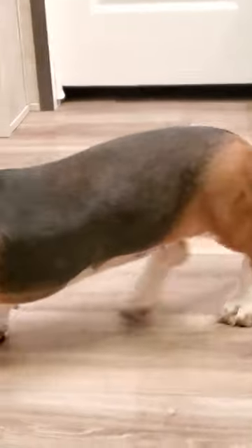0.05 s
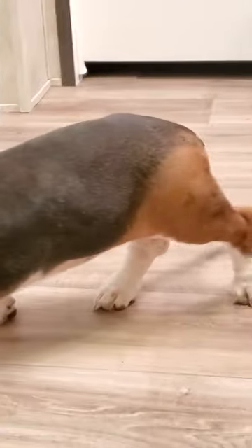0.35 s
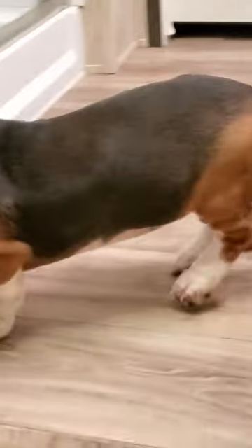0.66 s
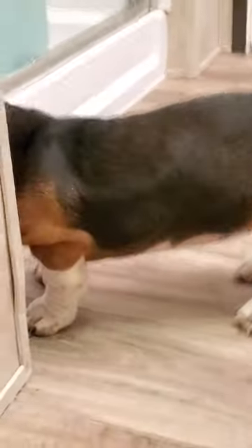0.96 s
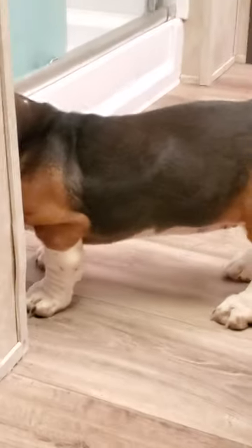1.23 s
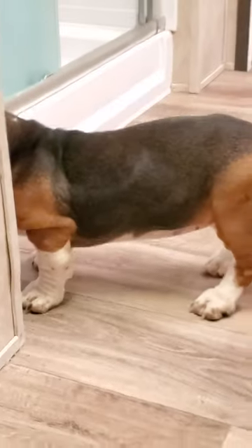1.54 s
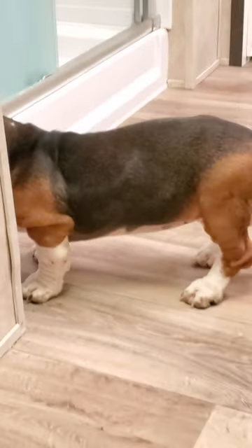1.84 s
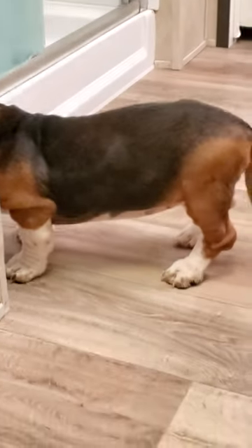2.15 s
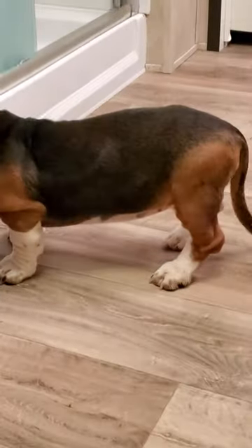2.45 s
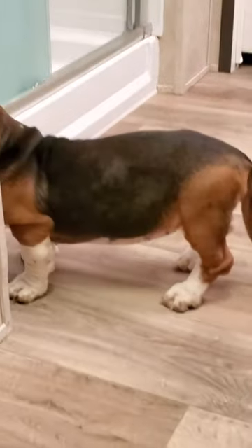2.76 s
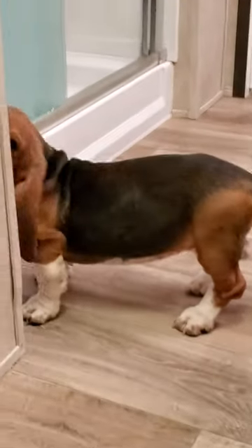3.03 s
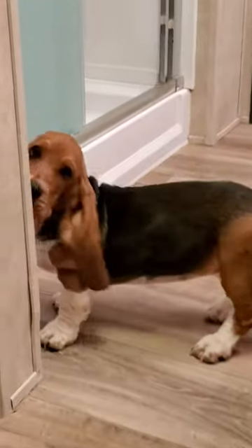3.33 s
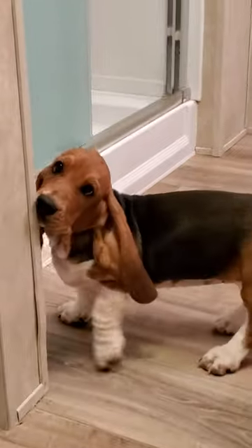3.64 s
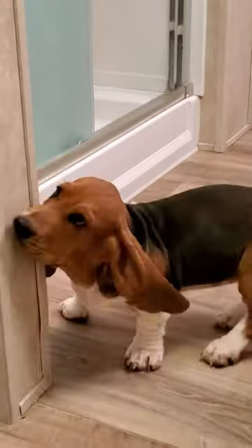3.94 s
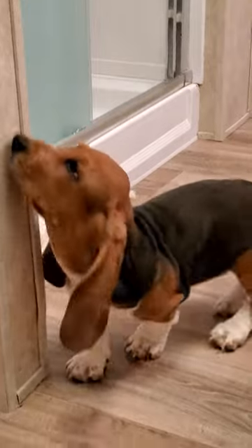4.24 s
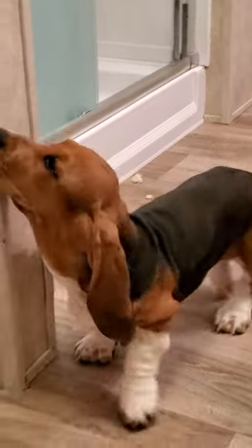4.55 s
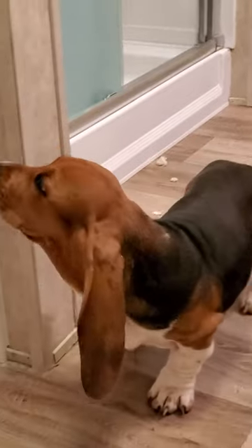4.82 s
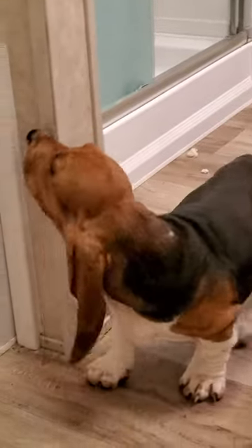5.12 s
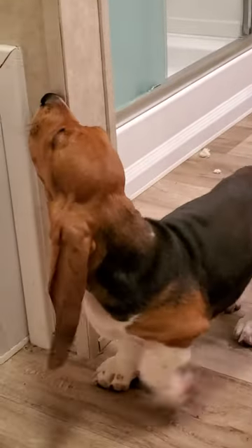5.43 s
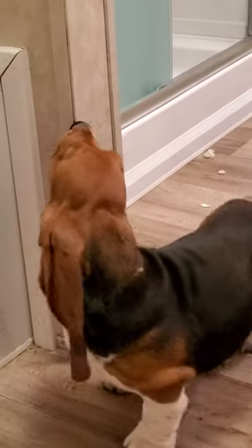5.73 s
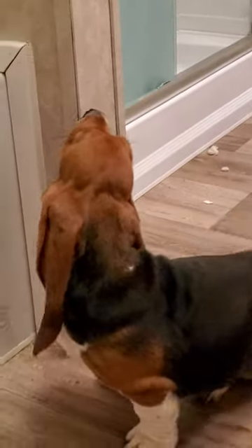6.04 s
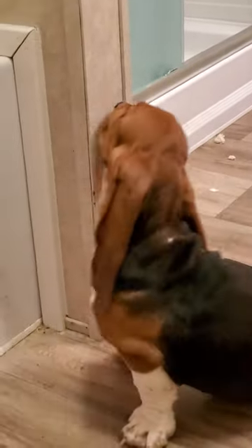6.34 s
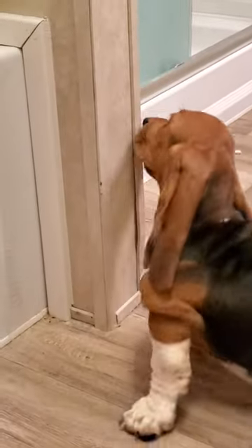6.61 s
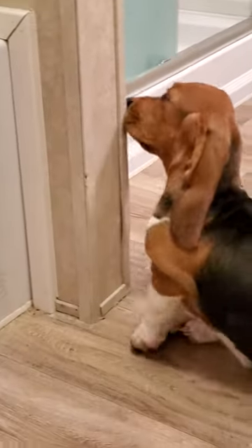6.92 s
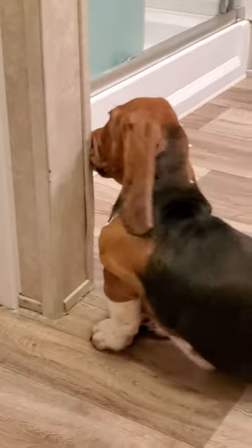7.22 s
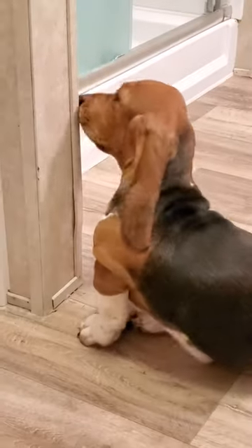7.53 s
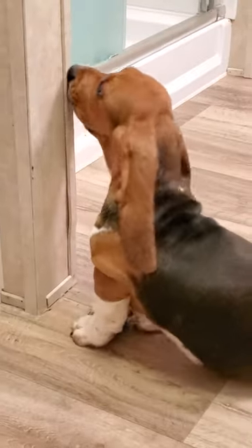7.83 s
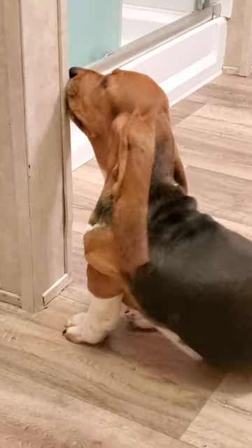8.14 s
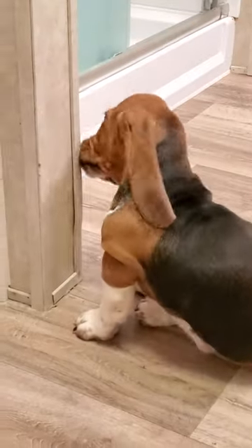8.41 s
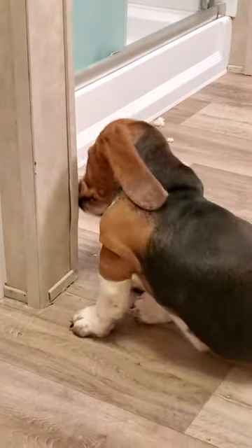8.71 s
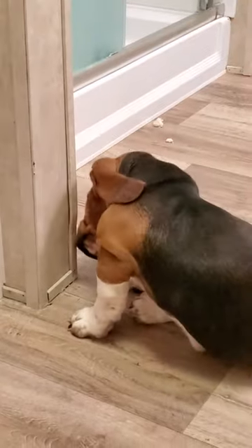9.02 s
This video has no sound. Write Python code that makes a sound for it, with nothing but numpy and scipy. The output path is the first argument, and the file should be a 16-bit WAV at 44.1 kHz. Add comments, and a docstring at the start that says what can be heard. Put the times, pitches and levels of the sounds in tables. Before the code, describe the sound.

A finger rubs over the microphone and ends with a low bump. A sleeve swishes close by on the right, with soft booms from a shifting grip. Then a puppy potters on a hard plank floor, claws ticking and pads scuffing irregularly, and gives a few short sniffs. The small bathroom adds a brief echo, over a faint steady hiss and hum.

```python
"""Puppy in a small bathroom

A puppy potters about on a plank floor: claws tick, pads scuff and thud, and it snuffles at a door
frame, while the walls echo and the glass and panels ring. The hand that holds a camera rubs over
the right microphone port and shifts its grip with low booms, and a sleeve swishes close by.
A faint mains hum lies under a steady background hiss."""
import sys
import numpy as np
from scipy import signal
from scipy.fft import rfft, irfft, next_fast_len
from scipy.io import wavfile
from scipy.ndimage import map_coordinates

SR = 44100
rng = np.random.default_rng(int(sys.argv[2]) if len(sys.argv) > 2 else 0)


def wav_out(sig):
    """Save sig, one row per channel (or a flat mono array), as 16-bit PCM at SR to the path in sys.argv[1]."""
    wavfile.write(sys.argv[1], SR, np.round(np.clip(np.atleast_2d(sig).T, -1, 1) * 32767).astype(np.int16))


N = 404260


def amp(db):
    """Amplitude ratio of a level in decibels."""
    return 10 ** (np.asarray(db) / 20)


def unit(x):
    """Normalisation to an rms of 1."""
    return x / np.sqrt(np.mean(x ** 2) + 1e-20)


def along(points, hz):
    """Interpolation of (f/Hz, value) points on a logarithmic frequency axis."""
    f, value = np.transpose(points)
    return np.interp(np.log(hz + 1), np.log(f + 1), value)


def wobble(rate, size=N):
    """Smooth random modulation: a spline through `rate` Gaussian knots a second."""
    knots = rng.standard_normal(int(size * rate / SR) + 4)
    return map_coordinates(knots, [np.arange(size) * rate / SR])


def filtered(x, response):
    """Linear filtering: the spectrum of x times a frequency response."""
    size = next_fast_len(x.shape[-1] + 8192)
    return irfft(rfft(x, size) * response(np.fft.rfftfreq(size, 1 / SR)), size)[..., :x.shape[-1]]


def coloured(x, spectrum, tilt_db):
    """Spectral shaping to rms 1, with a tilt of tilt_db per octave above about 1 kHz."""
    return unit(filtered(x, lambda hz: amp(along(spectrum, hz) + tilt_db * np.log2(1 + hz / 1000))))


def noise(spectrum, shape=N, tilt_db=0):
    """Gaussian noise of a given spectrum and rms 1."""
    return coloured(rng.standard_normal(shape), spectrum, tilt_db)


def add(track, start, sound):
    """Superposition of a sound on a track, `start` seconds in."""
    part = track[max(round(start * SR), 0):][:len(sound)]
    part += sound[:len(part)]


def stroke(length, taper):
    """A gesture's tapered-cosine envelope: swell, hold, release."""
    return signal.windows.tukey(int(length * SR), np.clip(taper, 0, 1))


def strokes(rows, taper):
    """The summed envelope of (t/s, duration/s, level/dB) gestures."""
    out = np.zeros(N)
    for start, length, db in rows:
        add(out, start, amp(db) * stroke(length, taper))
    return out


def linger(gain, seconds):
    """Exponential decay of an envelope's energy, with this time constant."""
    keep = np.exp(-1 / (seconds * SR))
    return np.sqrt(signal.lfilter([1 - keep], [1, -keep], gain ** 2))


def ports(pair):
    """Spatial coherence: two close microphones share the bass but not the treble."""
    # likeness of left and right: f/Hz, correlation
    coherence = [(60, 0.88), (250, 0.9), (700, 0.12), (1500, 0)]
    angle = lambda hz: np.arccos(np.clip(along(coherence, hz), -1, 1)) / 2
    mid, side = filtered(pair, lambda hz: np.array([np.cos(angle(hz)), np.sin(angle(hz))]))
    return np.array([mid + side, mid - side])


def background(hiss_db=-59.5):
    """Noise floor: a steady hiss, and mains harmonics that wander slightly in phase."""
    # spectrum of the steady background hiss, with a dip near 10 kHz: f/Hz, level/dB
    hiss_spectrum = [(20, -20), (42, -8.5), (65, -5.5), (90, -7.5), (130, -20), (160, -23), (330, -20),
                     (500, -23), (820, -30), (3400, -31.5), (5500, -38), (8300, -35.5), (9800, -51),
                     (15800, -39.5)]
    # mains harmonics: f/Hz, rms level/dB
    harmonics = [(59.8, -60), (119.8, -69.5), (240, -82), (359, -78)]
    t = np.arange(N) / SR
    hum = sum(amp(db) * np.sqrt(2) * np.sin(2 * np.pi * hz * t + 0.77 * wobble(1.8))
              for hz, db in harmonics)
    return amp(hiss_db) * unit(ports(noise(hiss_spectrum, (2, N)))) + hum


def finger():
    """Friction on a microphone port: dragging skin rasps and rumbles, squeaks faintly and bumps."""
    # fingertip drags: t/s, duration/s, rasp level/dB, rumble level/dB
    drags = [(0, 0.086, -64, -45.5), (0.125, 0.098, -43, -47.5), (0.201, 0.068, -46.5, -55),
             (0.274, 0.032, -44.5, -50), (0.308, 0.028, -42, -41), (0.342, 0.058, -50, -43),
             (.385, 0.0047, -41, -50), (0.387, 0.06, -37.5, -36.5), (.435, 0.088, -35, -40),
             (.505, 0.096, -35, -42), (0.577, 0.109, -46, -37), (0.658, 0.16, -54, -42)]
    # spectrum of rasping skin: f/Hz, level/dB
    rasp_spectrum = [(71, -14), (120, -10), (166, -6), (407, -5.5), (432, -5), (975, -8), (1490, -5),
                     (2980, -8), (4480, -13), (8950, -47), (11000, -34.5), (15500, -43.5)]
    # spectrum of skin squeaking on the case: f/Hz, level/dB
    squeak_spectrum = [(300, -10.5), (1500, -10), (1850, -0.5), (2200, -9.5), (4500, -20), (9000, -64)]
    # spectrum of the port's rumble: f/Hz, level/dB
    rumble_spectrum = [(20, -18), (45, -16), (75, -3), (120, -18.5), (300, -41), (1000, -86)]
    # fingertip impacts on the port: t/s, level/dB, f/Hz
    bumps = [(.317, -34.5, 69), (.765, -32, 330), (.770, -27.5, 231), (.778, -24, 51.6), (.798, -34, 1100)]
    start, length, rasp_db, rumble_db = np.transpose(drags)
    roughness = unit(amp(1.9 * wobble(70.06) + 0.92 * wobble(500)))
    skin = strokes(zip(start, length, rasp_db), taper=0.55) * roughness * noise(rasp_spectrum)
    squeak = stroke(length=0.55, taper=0.012)  # ends once the finger presses harder
    add(skin, 0, amp(-52.5) * squeak * noise(squeak_spectrum, len(squeak)))
    push = strokes(zip(start, length, rumble_db), taper=0.24)
    rumble = linger(push, seconds=0.015) * noise(rumble_spectrum)
    return skin + rumble + knocks(bumps, cycles=2.2, attack_s=0.00013, puff_db=4.5)


def knocks(rows, cycles, attack_s, puff_db):
    """Damped oscillation: a soft blow's tone and dull puff fall 60 dB in `cycles` periods."""
    out, t = np.zeros(N), np.arange(SR // 3) / SR
    for start, db, hz in rows:
        puff = noise([(hz / 2, -6), (hz, 0), (hz * 2, -11), (hz * 8, -36), (hz * 20, -70)], len(t))
        envelope = amp(-60 * t * hz / cycles) * (1 - np.exp(-t / attack_s))
        add(out, start, amp(db) * envelope * (np.sin(2 * np.pi * hz * t) + amp(puff_db) * puff))
    return out


def thuds():
    """Damped low tones: paws thud on the floor, and the hand booms as it shifts on the camera."""
    # soft low thuds of paws and hand: t/s, level/dB, f/Hz
    blows = [(.075, -40, 345), (1.07, -46, 135), (1.071, -46.5, 290), (1.071, -39.5, 620),
             (1.073, -34.5, 1070), (2.985, -42, 77), (3.037, -38, 78.5), (3.4, -46, 74), (4.09, -45.5, 98),
             (4.575, -47, 212), (4.6, -46.5, 87.6), (5.6, -45, 76.4), (6.002, -35, 245), (6.014, -36, 61.9),
             (6.028, -35, 171), (6.045, -34, 215), (7.535, -44, 505)]
    return knocks(blows, cycles=26.2, attack_s=0.007, puff_db=-6)


def sleeve(direct_share=0.24):
    """Cloth friction: each stroke hisses into the right port and rustles until the folds settle."""
    # strokes of the sleeve: t/s, duration/s, hiss level/dB, rustle level/dB
    swishes = [(.77, 0.13, -87, -57), (0.844, 0.043, -44, -46.5), (0.887, 0.21, -79, -70),
               (1.18, 0.36, -64, -52.5), (1.486, .15, -54.5, -58.5), (1.608, 0.35, -59.5, -59),
               (1.774, 0.41, -47.5, -59), (1.836, 0.12, -60, -56), (2.233, .15, -57, -70),
               (2.436, .14, -54, -56.5), (2.623, 0.15, -58, -70), (2.869, .12, -49, -59.5),
               (3.07, 0.16, -63.5, -83), (3.367, 0.12, -54, -64.5), (3.608, 0.23, -63, -62),
               (3.867, .11, -51.5, -60), (3.924, 0.25, -68.5, -76), (7.25, 0.68, -86, -66)]
    # spectrum of the silky hiss: f/Hz, level/dB
    hiss_spectrum = [(500, -8), (2500, -4.5), (5000, -6), (7500, -10), (9800, -7), (11500, 7.5), (14000, 1),
                     (16000, -4)]
    # spectrum of rustling folds: f/Hz, level/dB
    rustle_spectrum = [(300, -17), (1300, 3.5), (2200, 0.5), (3000, 5.5), (4200, 3), (7500, -1.5),
                       (10000, -7), (15000, -3.5)]
    start, length, hiss_db, rustle_db = np.transpose(swishes)
    hiss = strokes(zip(start, length, hiss_db), taper=0.95) * from_right(noise(hiss_spectrum))
    direct = np.sqrt(direct_share) * from_right(noise(rustle_spectrum))
    diffuse = np.sqrt(1 - direct_share) * noise(rustle_spectrum, (2, N))
    folds = linger(strokes(zip(start, length, rustle_db), taper=0.76), seconds=0.032)
    return hiss * amp([[-10], [0]]) + folds * (direct + diffuse)


def from_right(x, lag_s=0.000395):
    """Propagation delay: sound from the right reaches the left port later."""
    return np.array([filtered(x, lambda hz: np.exp(-2j * np.pi * hz * lag_s)), x])


def pad(length, tilt_db):
    """Stick-slip friction: a sliding pad catches and slips, so its hiss is grainy."""
    # spectrum of a pad on wood: f/Hz, level/dB
    spectrum = [(300, -21), (900, -10.5), (1350, 0), (1900, 1.5), (3200, -0.5), (5000, -11), (8000, -20.5),
                (15000, -39.5)]
    swell = stroke(length, taper=0.72)
    grain = amp(3.5 * wobble(524, len(swell)))
    return swell * unit(grain * noise(spectrum, len(swell), tilt_db))


def claw(hz, hard_db):
    """Impact excitation: a claw cracks on a plank and rings; harder is brighter and shorter."""
    # modes of the tick: frequency ratio, level/dB, T60/s at hard_db = 0
    modes = [(1.002, 0, 0.0093), (1.3, 0, 0.0037), (1.6, 7, 0.0037), (2.1, -4, 0.0047), (2.8, -32, 0.0032)]
    # spectrum of the first touch: f/Hz, level/dB
    crack_spectrum = [(200, -24), (900, -8), (1500, 3), (4500, 7), (8000, -19), (15000, -26)]
    t = np.arange(SR // 20) / SR
    damping = amp(hard_db)
    ring = 0
    for ratio, db, t60 in modes:
        strength_db = db + hard_db * np.log2(ratio) + rng.standard_normal()
        envelope = amp(strength_db - 60 * damping * t / t60)
        ring += envelope * np.sin(2 * np.pi * (hz * ratio * t + rng.random()))
    crack = noise(crack_spectrum, len(t)) * amp(-60 * t / 0.0045)
    tick = (ring + amp(2 * hard_db - 12) * crack) * (1 - np.exp(-t / 0.00065))
    return tick / np.abs(tick).max()


def paws(pad_lead_s=0.003, toe_gap_s=0.0027, toe_loss_db=8):
    """Successive contacts: a pad lands, then two toes tick; between steps the pads shuffle."""
    # steps: t/s, claw level/dB, f/Hz, hardness/(dB per octave), slide duration/s, pad level/dB
    steps = [(1.068, -34, 2966, -3, 0.014, -40), (3.713, -37, 1610, -13.5, 0.042, -56),
             (3.7558, -20, 1698, -2, 0.021, -47), (3.774, -46, 1730, 6, 0.015, -58),
             (3.995, -40, 2220, 13, 0.046, -62), (4.176, -47.5, 1646, -13, 0.069, -58),
             (4.241, -37.5, 1670, -6, 0.019, -57), (4.332, -32, 1660, 4.5, 0.0094, -56),
             (4.511, -45, 1650, -4, 0.057, -56.5), (4.568, -32.5, 1510, 3, 0.012, -60),
             (5.3453, -28.5, 1820, -3.5, .035, -42.5), (5.3537, -28.5, 1780, 3.5, 0.0092, -52),
             (5.452, -19, 1450, 4, 0.016, -36.5), (5.457, -25, 1530, 18, 0.012, -33),
             (5.461, -23.5, 1620, -1.5, 0.078, -47.5), (5.535, -39, 1483, -15, 0.078, -55),
             (5.695, -44, 1930, -3, 0.13, -59.5), (6.149, -44.5, 1860, -4, 0.028, -59),
             (6.298, -46.5, 1890, -12, 0.046, -64.5),          (6.483, -29.5, 2530, 0, 0.011, -38),
             (6.736, -44.5, 1840, 6, 0.18, -60), (6.97, -40, 1310, 2.5, .01, -64),
             (7.868, -48.5, 1830, 4, .01, -70), (8.181, -45, 1810, 3, 0.012, -64)]
    # pads shuffling without a step: t/s, duration/s, level/dB
    scuffs = [(4.316, 0.021, -49), (5.313, 0.046, -48), (5.986, 0.16, -57), (6.092, 0.36, -65),
              (6.858, 0.14, -58.5)]
    out = np.zeros(N)
    for start, db, hz, hard_db, slide_s, pad_db in steps:
        add(out, start - pad_lead_s, amp(pad_db) * pad(slide_s, tilt_db=0.32 * hard_db))
        add(out, start, amp(db) * claw(hz, hard_db))
        add(out, start + toe_gap_s, amp(db - toe_loss_db) * claw(hz, hard_db))
    for start, length, db in scuffs:
        add(out, start, amp(db) * pad(length, tilt_db=0.4))
    return out


def bathroom(x, wet_db, early_db, ring_db):
    """Reverberation: direct sound, early reflections, then a short tail in which panels ring."""
    # reverberation time of the room: f/Hz, T60/s
    decay_times = [(100, 0.9), (500, 0.52), (2000, 0.38), (5000, 0.39), (12000, 0.4)]
    # modes of the glass and panels: f/Hz, level/dB, T60/s
    panels = [(791.5, 3, 0.29), (1150, -5, 0.38), (1308, -11, 0.34), (1536, -11.5, 0.3), (1640, 0.5, 0.11),
              (1800, -13, 0.064), (1894, 3, 0.24), (2280, 2, 0.55), (2360, -32, 0.45), (3020, -6, 0.48),
              (3336, -1.5, 0.2), (4910, 7, 0.25)]
    hz, frame_s, bands = signal.stft(rng.standard_normal((2, SR // 2)), SR, nperseg=256)
    decay = amp(-60 * frame_s / along(decay_times, hz)[:, None])
    _, tail = signal.istft(bands * decay, SR, nperseg=256)
    t = np.arange(tail.shape[1]) / SR
    tail = ports(tail * (1 - np.exp(-t / 0.0017)))
    ring = sum(amp(db - 60 * t / t60) * np.sin(2 * np.pi * f * t + rng.normal(0, 0.58, (2, 1)))
               for f, db, t60 in panels)
    tail /= np.linalg.norm(tail[0])
    ring /= np.linalg.norm(ring[0])
    response = amp(wet_db) * (tail + amp(ring_db) * ring)
    for side in response:
        early_s = rng.uniform(0.002, 0.021, size=6)  # echoes from the near walls
        side[(early_s * SR).astype(int)] += amp(early_db)
    response[:, 0] += 1  # direct sound
    return signal.fftconvolve(x[None], response, axes=1)[:, :N]


def grip(attack_s=0.02, fall_db_per_s=155):
    """Forced vibration: each shift of the hand murmurs through the camera body's resonances."""
    # shifts of the hand: t/s, duration/s, level/dB
    shifts = [(1.28, 0.041, -54), (1.702, 0.047, -56.5), (2.065, 0.043, -54.5), (2.238, 0.029, -60),
              (2.491, 0.047, -59), (2.921, 0.085, -42), (3.31, 0.097, -53), (3.712, 0.048, -51.5),
              (4.014, 0.14, -56.5), (4.331, 0.056, -55.5), (4.56, 0.047, -59)]
    # modes of the camera body: f/Hz, bandwidth/Hz, level/dB
    modes = [(74.4, 6.5, 10.5), (183, 15, -2), (239, 9.9, 1.5), (296, 22, -1), (383, 9.4, 4),
             (637, 150, -11), (822, 86, -13), (1177, 40, -6.5), (1555, 77, -12), (2070, 540, -20)]
    t = np.arange(N) / SR
    effort = np.zeros(N)
    for start, length, db in shifts:
        rise = np.clip((t - start) / attack_s, 0, 1)
        effort += rise * amp(db - fall_db_per_s * np.maximum(t - start - length, 0))

    def body(hz):
        """Modal sum of band-pass resonances with alternating signs."""
        return sum((-1) ** k * amp(db) * 1j * hz * width / (centre ** 2 - hz ** 2 + 1j * hz * width)
                   for k, (centre, width, db) in enumerate(modes))

    return effort * unit(filtered(ports(rng.standard_normal((2, N))), body))


def snuffles(pops_per_s=280, pops_db=-7):
    """Flow noise: puffs hiss and crackle through wet nostrils, sounding hollow when these flare."""
    # puffs of air: t/s, duration/s, level/dB, hollow tone level/dB re the hiss
    puffs = [(2.551, 0.066, -70.5, 6.5), (4.906, 0.059, -35.5, -16.5), (5.794, 0.064, -43, -11),
             (5.841, 0.044, -35.5, -17), (5.896, 0.032, -35, -13.5), (5.94, 0.066, -56.5, -4.5),
             (6.966, 0.046, -57, -1.5), (7.878, 0.11, -66.5, -10.5), (7.978, 0.052, -40, -14.5),
             (8.004, 0.034, -44.5, -6.5)]
    # spectrum of air in the nose: f/Hz, level/dB
    nose_spectrum = [(300, -54), (520, -39), (780, -19), (980, -21.5), (1150, -8.5), (1530, -3.5),
                     (1900, 2), (2300, -4.5), (2900, 1), (3700, -5), (4400, -9.5), (4900, -11),
                     (6700, -19.5), (15500, -46.5)]
    # resonance of flared nostrils: f/Hz, level/dB
    hollow_spectrum = [(300, -19), (600, -5), (780, 1), (1000, 1), (1150, 5.5), (1600, -5), (3000, -29)]
    out = np.zeros(N)
    for start, length, db, hollow_db in puffs:
        swell = stroke(length, taper=0.41)
        size = len(swell)
        pops = rng.standard_normal(size) * (rng.random(size) < pops_per_s / SR)
        crackle = amp(pops_db) * coloured(pops, nose_spectrum, tilt_db=1.5)
        hiss = noise(nose_spectrum, size)
        hollow = amp(hollow_db) * noise(hollow_spectrum, size)
        flutter_db = 2.13 * wobble(240, size)
        add(out, start, amp(db + flutter_db) * swell * (hiss + hollow + crackle))
    return out


def scene():
    """Superposition of the puppy in the room, the hand and sleeve close by, and the background."""
    feet = bathroom(paws(), wet_db=1.7, early_db=-14.5, ring_db=-21)
    nose = bathroom(snuffles(), wet_db=3, early_db=-9.5, ring_db=-15)  # aimed at the wall: mostly echo
    puppy = (feet + nose) * amp([[0.7], [-0.3]])
    return puppy + thuds() + finger() * amp([[-21], [0]]) + sleeve() + grip() + background()


def record(dry, top_hz=15850):
    """Band limiting: an ideal low-pass filter passes nothing above top_hz."""
    return filtered(dry, lambda hz: hz < top_hz)


dry = scene()
out = record(dry)
wav_out(out)
```